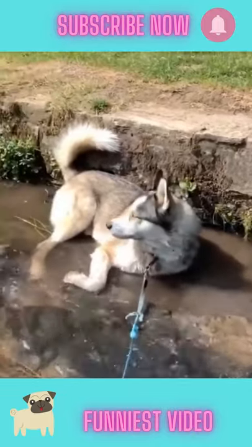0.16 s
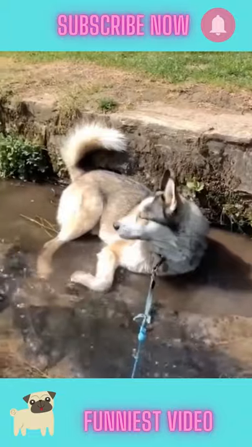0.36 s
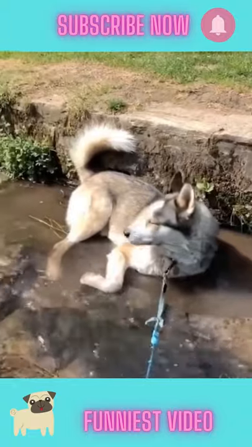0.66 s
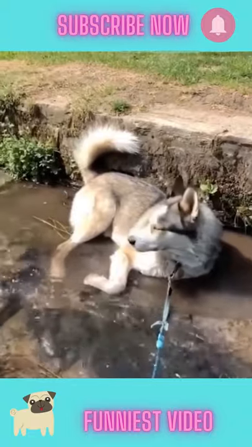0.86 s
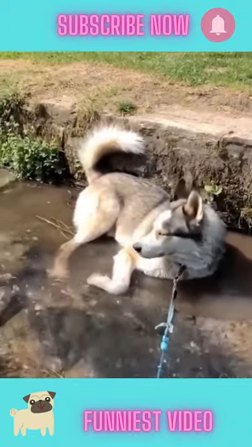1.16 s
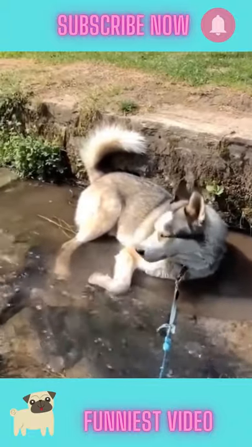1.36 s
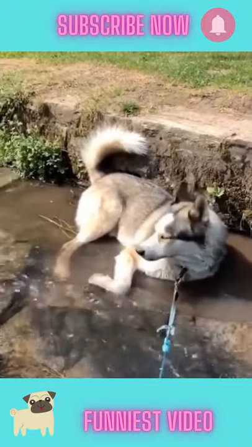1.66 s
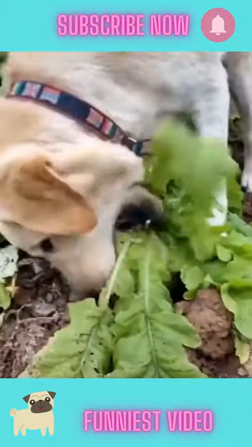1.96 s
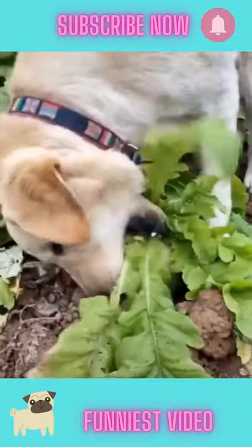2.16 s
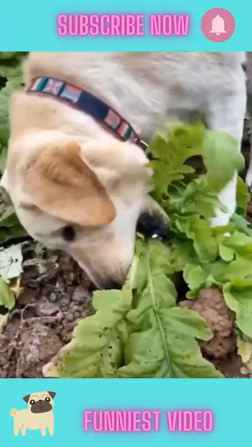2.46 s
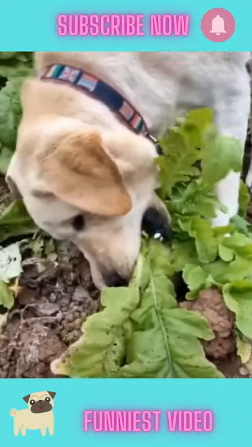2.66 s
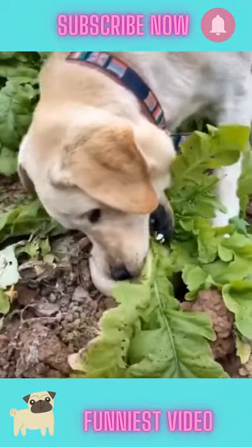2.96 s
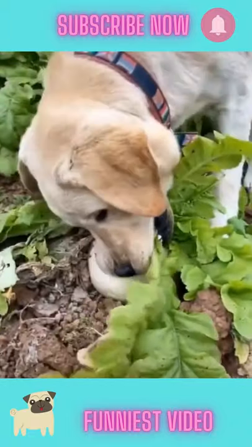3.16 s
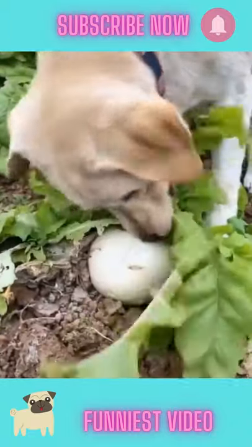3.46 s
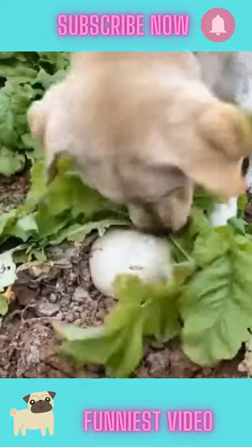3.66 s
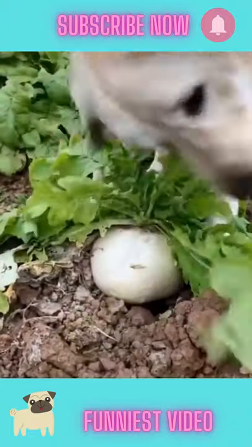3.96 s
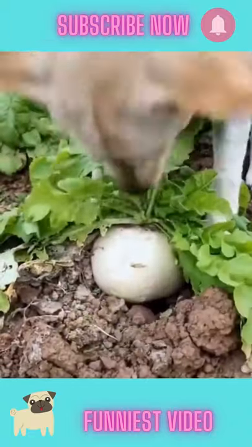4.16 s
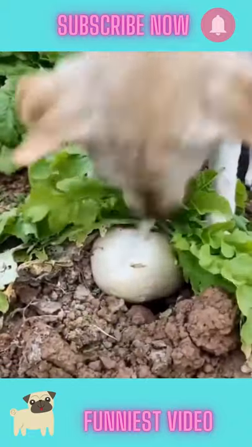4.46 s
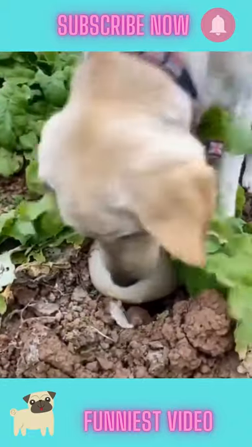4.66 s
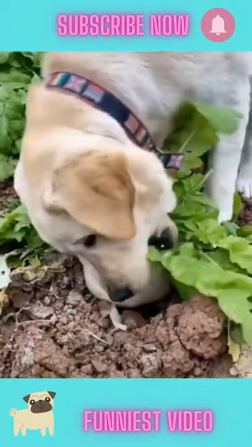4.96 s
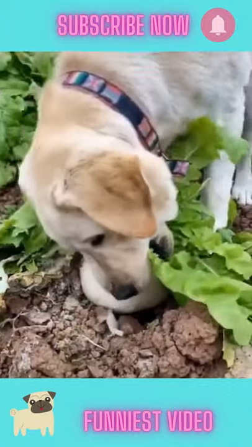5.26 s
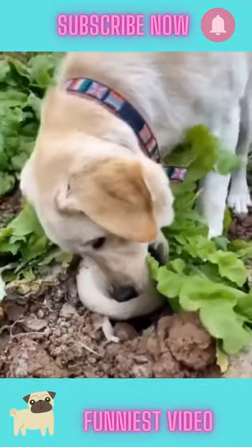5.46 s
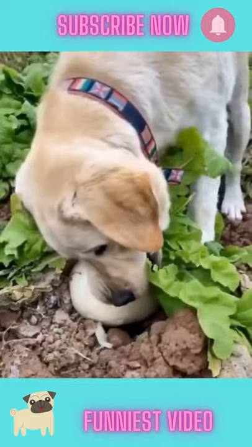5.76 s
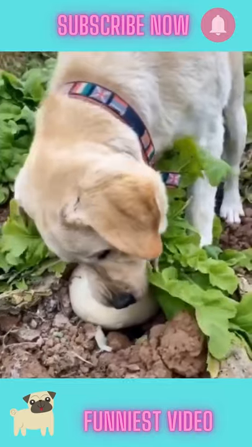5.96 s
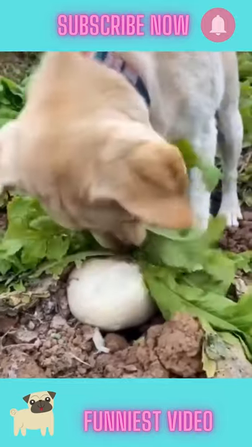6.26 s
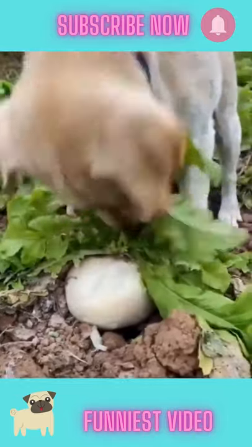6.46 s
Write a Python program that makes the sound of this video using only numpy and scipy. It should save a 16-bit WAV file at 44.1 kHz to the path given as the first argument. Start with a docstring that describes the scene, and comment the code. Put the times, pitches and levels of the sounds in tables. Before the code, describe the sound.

Water laps softly and wide around, slightly left, with plips rising in pitch, and ebbs nearly to silence. At two seconds the sound jumps to a close, dry, centred view of a dog biting a radish: bright irregular cracks, loudest before four seconds, swishing leaves, rolling crumbs and even snuffles; then a sparser middle and renewed crunching to the end. No voices.

```python
"""A dog lies in a shallow stream: water trickles and plips over a soft low rumble, and dies away.
Noise makes the flow; ringing bubbles and tiny clicks make the drops.
After two seconds, close up in a vegetable bed, another dog gnaws a big radish. Short noise bursts make
the crisp snaps, clicks and noise the rustling leaves and crumbling soil; shaped noise makes its snuffling.
Jaws close, teeth slip, and paws and muzzle thud on the ground: all short, fading rings."""
import sys
import numpy as np
from scipy import signal
from scipy.fft import rfft, irfft, next_fast_len
from scipy.io import wavfile
from scipy.ndimage import map_coordinates

SR = 44100
rng = np.random.default_rng(int(sys.argv[2]) if len(sys.argv) > 2 else 0)


def waveform_to_disk(signal):
    """Save audio, clipped to [-1, 1], as 16-bit WAV at the path in sys.argv[1]."""
    frames = np.transpose(np.atleast_2d(signal))
    scaled = np.clip(frames, -1, 1) * 32767
    samples = np.round(scaled).astype(np.int16)
    wavfile.write(sys.argv[1], SR, samples)


N = 291934

GARDEN_START_S = 2.005   # the stream gives way to the vegetable bed
CUTOFF_HZ = 15800

# All levels in the tables are relative: the functions below add their own gains.


def from_db(db):
    """Turn decibels into a plain factor."""
    return 10 ** (np.asarray(db) / 20)


def rms_one(x):
    """Scale a sound to an average strength (rms) of 1."""
    return x / np.sqrt(np.mean(x ** 2) + 1e-20)


def in_time(rows):
    """The columns of a curve, one value per sample."""
    s, *columns = np.transpose(rows)
    return [np.interp(np.arange(N) / SR, s, column) for column in columns]


def seconds(length):
    """A clock that starts at 0 and lasts the given seconds."""
    return np.arange(int(length * SR)) / SR


def add(track, s, sound):
    """Mix a sound in at time s."""
    at = max(round(s * SR), 0)
    track[at:at + len(sound)] += sound[:N - at]


def drift(rate):
    """Smooth random ups and downs around 0, with `rate` new values per second."""
    return np.interp(np.arange(N) / SR * rate, np.arange(4000), rng.standard_normal(4000))


def colour(x, spectrum):
    """Give a noise its balance of low and high pitches; rms 1."""
    hz, db = np.transpose(spectrum)
    size = next_fast_len(N)
    f = np.maximum(np.fft.rfftfreq(size, 1 / SR), 1)
    skirt = np.minimum(f / hz[0], 1) ** 2 * np.minimum(hz[-1] / f, 1) ** 2   # fade beyond both ends
    gain = skirt * from_db(np.interp(np.log(f), np.log(hz), db))
    return rms_one(irfft(rfft(x, size) * gain, size)[:N])


def band(x, low_hz, high_hz):
    """Keep the pitches between two limits."""
    edges = [low_hz, min(high_hz, SR / 2 - 1000)]
    return signal.sosfilt(signal.butter(2, edges, "band", fs=SR, output="sos"), x)


def resonate(x, hz, q):
    """One resonance, gain 1 on top; a higher q rings longer."""
    r = np.exp(-np.pi * hz / q / SR)
    feed = np.array([1, 0, -1]) * (1 - r * r) / 2
    return signal.lfilter(feed, [1, -2 * r * np.cos(2 * np.pi * hz / SR), r * r], x + 1e-18)


def grains(per_s, spread_db, low_hz, high_hz, q, count=18):
    """Clumps of random clicks of uneven size, each ringing at one of many pitches; rms 1."""
    sizes = from_db(spread_db * np.minimum(rng.exponential(1, N), 4)) * rng.choice([-1, 1], N)
    chance = per_s * from_db(3 * drift(110)) / SR   # rises and falls, so clicks come in clumps
    clicks = sizes * (rng.random(N) < chance)
    dealt = rng.integers(0, count, N)
    pitches = np.geomspace(low_hz, min(high_hz, CUTOFF_HZ), count)
    return rms_one(sum(resonate(clicks * (dealt == k), hz, q) for k, hz in enumerate(pitches)))


def wander(x, depth_db, width_hz, per_s):
    """Surfaces that flex and move: peaks about width_hz wide come and go in the sound; rms 1."""
    hz, s, frames = signal.stft(x, SR, nperseg=512)
    patches = rng.standard_normal((400, 500))
    where = np.meshgrid(hz / width_hz, s * per_s, indexing="ij")
    gain_db = depth_db * map_coordinates(patches, where, order=1, mode="mirror")
    return rms_one(signal.istft(frames * from_db(gain_db), SR)[1][:N])


# bites through root and stalk: (time [s], level [dB], crack pitch [Hz],
# knock of the flesh relative to the crack [dB])
BITES = [(2.207, -5, 10400, -2), (2.3145, -10.5, 10500, -1), (2.454, -16, 8500, -24),
         (2.491, -18, 7800, -5), (2.6494, -17, 3830, -11), (2.7034, -17, 4000, -5),
         (2.7196, -11.5, 4200, -13), (2.7587, -13, 3900, -7), (2.842, -7, 7400, -15),
         (2.848, -16.5, 5030, -3), (2.9032, -16.5, 9150, -11), (3.2738, -15.5, 7400, -4),
         (3.2848, -0.5, 9350, -1), (3.486, -2.5, 7660, -3.5), (3.5565, -17.5, 8000, -10),
         (3.5894, -12, 8800, -1), (3.756, 1, 9800, -7), (3.7845, -6.5, 3430, -2.5),
         (3.806, -10.5, 7050, -12), (3.8106, -9, 5500, 3), (4.0089, -8.5, 8200, -8.5),
         (4.3466, -16, 8900, -3), (4.9378, -22.5, 4000, 0), (4.976, -17, 12900, -16),
         (5.477, -13, 12800, -9.5), (5.5372, -15, 12400, -14), (5.593, -15.5, 11750, -4),
         (5.75, -12, 4800, -10.5), (5.8347, -10.5, 8950, -3), (5.841, -16, 9500, -14),
         (5.97, -14.5, 4570, -13), (6.1042, -11.5, 8000, -3), (6.133, -6, 3670, -16),
         (6.1491, -6.5, 3840, -11), (6.3781, -3.5, 8250, -9), (6.4434, -8.5, 7600, -4),
         (6.492, -22.5, 7000, 5.5), (6.4989, -21.5, 6550, 3), (6.5298, -9, 3570, 3),
         (6.5735, -25.5, 2980, 2)]
# the flesh knocks at about the same pitch in every bite
KNOCK_HZ, KNOCK_SCATTER_OCT = 1460, 0.12


def snaps(run_s=0.00034, tear_s=0.00057, push=3, strain_s=0.0093, strain_db=-26,
          crumble_s=0.01, crumble_db=-19, crack_q=5.9, broad_db=-7, knock_q=0.89,
          yield_s=0.001211, gain_db=-11, thin_hz=8000, broad_db_per_oct=4):
    """Cells give under strain, then a crack runs in about a millisecond; the flesh knocks and crumbles."""
    lead_s, span = .012, .003 * SR
    out, t = np.zeros(N), seconds(.06) - lead_s
    after = np.maximum(t, 0)
    strain = from_db(strain_db) * np.exp(-np.abs(t) / strain_s)
    tear = np.exp(-np.maximum(after - run_s, 0) / tear_s)
    crumble = from_db(crumble_db) * np.exp(-after / crumble_s)
    burst = np.where(t < 0, strain, tear + crumble)
    for s, crack_db, crack_hz, knock_db in list(BITES) + fibres():
        cells, flesh = rng.choice([-1, 1], (2, len(t))) * burst
        flesh[round(lead_s * SR)] += push   # the sudden release pushes the whole piece
        knock_hz = KNOCK_HZ * 2 ** (KNOCK_SCATTER_OCT * rng.standard_normal())
        # thick stalks crack lower and splinter less
        splinter_db = broad_db + broad_db_per_oct * np.log2(crack_hz / thin_hz)
        splinter = from_db(splinter_db) * band(cells, 4370, 12900)
        crack = resonate(cells, crack_hz, crack_q) + splinter
        knock = band(resonate(flesh, knock_hz, knock_q) + 0.42 * flesh, 274, 2700)
        for part, db in ((crack, crack_db), (knock, crack_db + knock_db)):
            even = part * np.sqrt(span / np.sum(part ** 2))   # same energy before its level is set
            add(out, s + yield_s - lead_s, from_db(db + gain_db) * even)
    return out


# pushing through the plant: (time [s], leaves level [dB], soil level [dB])
STIRRING = [(2.12, -46, -44.5), (2.19, -41.5, -38), (2.36, -38, -38), (2.54, -36, -43.5), (2.68, -41, -43),
            (3.15, -36, -44), (3.61, -37, -40.5), (4.7, -41.5, -41.5), (4.99, -44, -39.5),
            (5.13, -37.5, -41), (5.26, -40.5, -43.5), (5.9, -47.5, -45), (6.35, -40, -43.5),
            (6.62, -46, -45.5)]
# small fibres give way at random, at a level above that of the leaves
FIBRES_PER_S, FIBRE_DB, FIBRE_SPREAD_DB, FIBRE_KNOCK_DB = 22, 11.5, 1.5, -12
FIBRE_LOW_HZ, FIBRE_HIGH_HZ = 2800, 12000


def fibres():
    """Faint snaps at random moments, louder where the leaves are stirred more; rows like BITES."""
    span = N / SR - GARDEN_START_S
    when, size, pitch = rng.random((int(FIBRES_PER_S * span), 3)).T
    s = GARDEN_START_S + when * span
    leaves_db = in_time(STIRRING)[0][(s * SR).astype(int)]
    db = leaves_db + FIBRE_DB + FIBRE_SPREAD_DB * np.minimum(-np.log(1 - size), 2)
    crack_hz = FIBRE_LOW_HZ * (FIBRE_HIGH_HZ / FIBRE_LOW_HZ) ** pitch
    return [(at, level, hz, FIBRE_KNOCK_DB) for at, level, hz in zip(s, db, crack_hz)]


# the jaws close on root or stalk: (time [s], level [dB])
JAW_BLOWS = [(2.022, -26), (2.7566, 3.5), (2.7742, -18), (2.9766, -12), (3.0002, -15.5), (4.7208, -6),
             (4.743, -18.5)]
# the hollow of the mouth: (pitch [Hz], level [dB], time to fade by 60 dB [s])
MOUTH_RINGS = [(542, -13, 0.025), (990, 3.5, 0.012), (1300, -5.5, 0.009)]


def clops(attack_s=0.0019, gain_db=4):
    """A soft blow of the jaws rings the hollow of the mouth, shaped a little differently each time."""
    out, t = np.zeros(N), seconds(.06)
    for s, db in JAW_BLOWS:
        ring = np.zeros(len(t))
        for hz, level, t60 in MOUTH_RINGS:
            shaped_hz = hz * (1 + 0.017 * rng.standard_normal())
            ring += from_db(level - 60 * t / t60) * np.sin(2 * np.pi * shaped_hz * t)
        add(out, s, from_db(db + gain_db) * (1 - np.exp(-t / attack_s)) * ring)
    return out


# a tooth slips on the root: (time [s], level [dB])
TOOTH_SLIPS = [(2.721, -19.5), (2.7703, -18.5), (2.7804, -23), (2.788, -26), (2.9032, -27)]
# what rings when it catches: (pitch [Hz], level [dB], time to fade by 60 dB [s])
TOOTH_RINGS = [(1937, 0.5, 0.028), (3830, -16, 0.018)]


def tooth_slips(grit=0.35):
    """A tooth slips on the hard root and catches again with a short, gritty ring."""
    out, t = np.zeros(N), seconds(.04)
    for s, db in TOOTH_SLIPS:
        for hz, level, t60 in TOOTH_RINGS:
            rasp = rms_one(resonate(rng.standard_normal(len(t)), hz, 2))
            ring = np.sin(2 * np.pi * hz * t) + grit * rasp
            add(out, s, from_db(db + level - 60 * t / t60) * ring)
    return out


# balance of the leaf sound: (pitch [Hz], level per Hz [dB])
LEAF_SPECTRUM = [(900, -5), (1800, 1.5), (3000, -1.5), (4300, 0.5), (6000, -2.5), (8000, 0.5),
                 (11000, -0.5), (13500, 2.5), (14500, 0), (16000, -12)]
# balance of the soil sound: (pitch [Hz], level per Hz [dB])
SOIL_SPECTRUM = [(30, -11), (60, 5.5), (130, 4.5), (330, -4), (600, 2.5), (1000, -4), (1500, -4),
                 (2300, -11), (4000, -9.5)]


def rummage(leaves_gain_db=-2, soil_gain_db=0, crumbs_db=-6, slide_db=-7, hollow_db=-11, soil_slack=0.8):
    """Stirred or dragged leaves crinkle, soil crumbs roll under them; the rubbing sounds in the open mouth."""
    leaves_db, soil_db = in_time(STIRRING)
    pause_db = slack()
    soil_db = soil_db + soil_slack * pause_db
    creases = grains(per_s=2600, spread_db=2.6, low_hz=1100, high_hz=15600, q=4.5)
    slide, flutter = rng.standard_normal(N), from_db(1.03 * drift(200))
    rubbing = colour(creases + from_db(slide_db) * slide, LEAF_SPECTRUM)
    crinkle = wander(rubbing, depth_db=5.5, width_hz=200, per_s=26) * flutter
    stirred = from_db(leaves_db + leaves_gain_db + pause_db + 2.3 * drift(30))
    leaves = (stirred + tugs()) * crinkle
    soil = wander(colour(rng.standard_normal(N), SOIL_SPECTRUM), depth_db=4, width_hz=130, per_s=30)
    crumbs = grains(per_s=650, spread_db=3.5, low_hz=448, high_hz=1950, q=4.0)
    hollow = rms_one(resonate(crumbs + soil, MOUTH_RINGS[1][0], 9)) * from_db(3 * drift(9))
    ground = from_db(soil_gain_db) * soil + from_db(crumbs_db) * crumbs + from_db(hollow_db) * hollow
    return leaves + swishes(crinkle) + from_db(soil_db) * ground


# every bite pulls the leaves taut and lets them spring back
TUG_RISE_S, TUG_FALL_S = 0.0048, 0.0056
TUG_DB, TUG_FOLLOWS = -32, 0.41   # for a bite of 0 dB in the table; share of the bite's level


def tugs():
    """How strongly the leaves shake round each bite: a quick swell up to the snap and a quick fall."""
    out, t = np.zeros(N), seconds(.2) - .1
    swell = np.exp(-np.abs(t) / np.where(t < 0, TUG_RISE_S, TUG_FALL_S))
    for s, db, *_ in BITES:
        add(out, s + t[0], from_db(TUG_DB + TUG_FOLLOWS * db) * swell)
    return out


# the dog lets go of leaves and soil: (time [s], length [s], change in level [dB])
LETTING_GO = [(2.8, 0.038, -20), (3.02, 0.24, -1), (3.229, 0.042, -13), (3.33, 0.03, -3.5),
              (3.803, 0.047, -5), (5.314, 0.088, -2.5), (5.855, 0.09, -1)]


def slack():
    """The leaves grow quieter for a moment whenever the dog lets go; dB."""
    out = np.zeros(N)
    for s, length, db in LETTING_GO:
        add(out, s, db * np.hanning(len(seconds(length))) ** 0.38)
    return out


# leaves dragged and torn: (time [s], length [s], level [dB], strongest pitch [Hz],
# growth over the stroke [dB])
LEAF_STROKES = [(2.265, 0.036, -30, 12000, -7), (2.592, 0.26, -36.5, 3700, 0), (3.357, 0.16, -29, 3500, 4),
                (3.563, 0.055, -32.5, 8000, -3), (3.668, 0.12, -33.5, 2800, 8),
                (3.872, 0.22, -32.5, 9200, -5.5), (4.228, 0.18, -32, 13300, -6),
                (4.953, 0.11, -34.5, 4360, -3), (5.252, 0.049, -37.5, 3670, 17),
                (5.581, 0.022, -29, 12600, 0), (5.636, 0.018, -31.5, 13000, 6),
                (5.949, 0.051, -35, 4370, -11), (6.074, 0.092, -33.5, 3150, -12),
                (6.217, 0.13, -35, 3300, 2)]


def swishes(crinkle, leaf_q=26.0, leaf_db=0, stalk_db=-10, gain_db=-2.5):
    """A dragged leaf catches and slips: its own resonance colours the crinkle; its stalk scrapes duller."""
    out = np.zeros(N)
    scrape = grains(per_s=1700, spread_db=3.0, low_hz=465, high_hz=2160, q=5.4)
    catch = from_db(2.5 * drift(600))
    for s, length, db, hz, growth_db in LEAF_STROKES:
        stroke = slice(int(s * SR), int((s + length) * SR))
        rub = (crinkle * catch)[stroke]
        blade = rms_one(rub + from_db(leaf_db) * resonate(rub, hz, leaf_q))
        growth = from_db(growth_db * np.linspace(-.5, .5, len(rub)))
        swell = np.hanning(len(rub)) ** 0.12 * growth
        add(out, s, from_db(db + gain_db) * swell * (blade + from_db(stalk_db) * scrape[stroke]))
    return out


# a scrape that falls in pitch just before the jaws close
SCRAPE_S, SCRAPE_LENGTH_S, SCRAPE_DB, SCRAPE_FROM_HZ, SCRAPE_TO_HZ = 4.643, 0.052, -32.5, 3300, 680


def falling_scrape(q=3.2, count=5):
    """Gritty rubbing in a resonance that slides down, as a run of overlapping steps."""
    out, step_s = np.zeros(N), SCRAPE_LENGTH_S / (count + 1)
    swell = np.sqrt(np.hanning(len(seconds(2 * step_s))))
    for k, hz in enumerate(np.geomspace(SCRAPE_FROM_HZ, SCRAPE_TO_HZ, count)):
        grit = rng.standard_normal(SR // 10) ** 3   # cubing makes the noise spiky
        rub = rms_one(resonate(grit, hz, q))[-len(swell):]
        add(out, SCRAPE_S + k * step_s, from_db(SCRAPE_DB) * swell * rub)
    return out


# the dog's nose in the plant, in even bouts: (start time [s], time from puff to puff [s], end time [s],
# level of the first puff [dB], hiss relative to the puff [dB], hiss pitch [Hz])
NOSE_BOUTS = [(2.08, 0.24, 2.2, -32, -15, 1900), (2.46, 0.25, 3.55, -30.5, -7, 1900),
              (4.958, 0.268, 6.15, -30, -8, 2900)]
# the first puff is the longest; each next one is weaker
PUFF_S, FIRST_PUFF_S, PUFF_FADE_DB, NOSTRIL_HZ = 0.077, 0.092, -1.56, 765


def snuffles(nostril_q=2.7, hiss_q=3.1, flutter_db=3, gain_db=0.0):
    """Puffs from the nose swell fast and ebb, fluttering against the leaves and stirring up grit."""
    out = np.zeros(N)
    for start, period, end, db, hiss_db, hiss_hz in NOSE_BOUTS:
        for k, s in enumerate(np.arange(start, end, period)):
            air, grit = rng.standard_normal((2, SR // 4))
            nostril = rms_one(resonate(band(air, 130, 1430), NOSTRIL_HZ, nostril_q))
            hiss = rms_one(resonate(resonate(grit * grit * grit, hiss_hz, hiss_q), hiss_hz, hiss_q))
            puff_s = PUFF_S if k else FIRST_PUFF_S
            progress = np.minimum(np.arange(len(air)) / SR / puff_s, 1)
            swell = np.sin(np.pi * progress ** 0.48)   # early top, slow ebb
            puff = swell * (nostril + from_db(hiss_db) * hiss)
            add(out, s, from_db(db + gain_db + k * PUFF_FADE_DB) * puff)
    return out * from_db(flutter_db * drift(200))


# paws and muzzle on soft ground: (time [s], level [dB], pitch [Hz])
GROUND_BLOWS = [(2.345, -31, 125), (2.472, -31, 248), (2.76, -30.5, 218), (2.77, -29.5, 96),
                (2.978, -36, 203), (3.446, -32.5, 220), (3.985, -30.5, 182), (4.001, -29.5, 97),
                (6.378, -33.5, 160)]


def thuds(t60=0.07, attack_s=0.0044, earth=0.71):
    """Soft earth gives a few low cycles and a dull scuff."""
    out, t = np.zeros(N), seconds(0.12)
    for s, db, hz in GROUND_BLOWS:
        scuff = rms_one(band(rng.standard_normal(len(t)), 46, 1040))
        push = np.sin(2 * np.pi * hz * t) + earth * scuff
        add(out, s, from_db(db + 10.0 - 60 * t / t60) * (1 - np.exp(-t / attack_s)) * push)
    return out


# the flow of the stream: (time [s], rumble level [dB], wash level [dB], spray level [dB])
FLOW = [(0.0, -39, -40.5, -43.5), (0.49, -43, -46, -50.5), (1.114, -44.5, -51, -55.5),
        (1.61, -51, -54.5, -57.5), (1.98, -58, -64.5, -69)]
# balance of the low rumble: (pitch [Hz], level per Hz [dB])
RUMBLE_SPECTRUM = [(25, -10), (42, 1.5), (113, 0), (260, -13), (500, -20)]
# balance of the soft wash: (pitch [Hz], level per Hz [dB])
WASH_SPECTRUM = [(150, -3.5), (300, -3.5), (600, -7), (1300, -11), (2200, -9), (3000, -20), (4500, -13.5)]
# balance of the fine spray: (pitch [Hz], level per Hz [dB])
SPRAY_SPECTRUM = [(2000, -31), (3000, -7.5), (4200, 0), (5300, -15.5), (7300, -1), (9000, -19.5),
                  (12500, -46), (14500, -40)]
# water lapping all around, different at the two sides: (pitch [Hz], level per Hz [dB])
LAPPING_SPECTRUM = [(60, -29), (133, -6), (1040, 6), (1720, -12), (4320, 5), (9000, -55)]
STREAM_LAG_S = 0.00009   # the water lies to the left and reaches the right side later


def stream(spray_db=-5, wash_gain_db=-3, bubbles_db=-3.5, rumble_gain_db=1, lapping_db=-7.0, ticks_db=-17):
    """Small bubbles in a soft wash, fine spray with lone ticks above and a rumble below; left and right."""
    rumble_db, wash_db, spray_level_db = in_time(FLOW)
    rumble = from_db(rumble_db + rumble_gain_db) * colour(rng.standard_normal(N), RUMBLE_SPECTRUM)
    wash_noise = colour(rng.standard_normal(N), WASH_SPECTRUM)
    wash = from_db(wash_db + wash_gain_db) * wander(wash_noise, depth_db=6.0, width_hz=120, per_s=24)
    crowd = gurgle(per_s=400, low_hz=520, high_hz=2900, spread_db=2.7, small_db=-2)
    bubbles = from_db(wash_db + bubbles_db) * crowd
    drops = grains(per_s=3200, spread_db=1.4, low_hz=2630, high_hz=11900, q=18)
    fine = wander(colour(drops, SPRAY_SPECTRUM), depth_db=6, width_hz=331, per_s=19)
    spray = from_db(spray_level_db + spray_db + 2.9 * drift(28.06)) * fine
    lone = grains(per_s=22, spread_db=-0.5, low_hz=5500, high_hz=11200, q=22)
    ticks = from_db(spray_level_db + ticks_db) * lone
    water = rumble + wash + bubbles + plips()
    lapping_noise = colour(rng.standard_normal(N), LAPPING_SPECTRUM)
    lapping = from_db(wash_db + lapping_db) * wander(lapping_noise, depth_db=4.5, width_hz=202, per_s=22)
    # lapping is flipped at the right, so it seems to come from all around
    left, right = water + lapping, np.roll(water, round(STREAM_LAG_S * SR)) - lapping
    return np.array([left, right]) + spray + ticks + spatters()


# large air bubbles: (time [s], level [dB], starting pitch [Hz], rise [starting pitches per s])
LARGE_BUBBLES = [(0.051, -22.5, 2030, 1.8), (0.113, -26, 1336, 2.1), (0.203, -37, 1350, 5),
                 (0.353, -31, 2060, 2.2), (0.489, -36, 2560, 1.8), (0.619, -32, 1235, 2.4),
                 (0.636, -29, 952, 1.4), (0.737, -37, 1385, 4.3), (0.765, -33.5, 1470, 5.7),
                 (0.799, -34, 895, 8.1), (0.823, -35, 3200, 2), (0.834, -37, 1300, 3),
                 (0.979, -39.5, 2110, 2), (1.285, -38, 746, 3), (1.305, -39, 1370, 14),
                 (1.355, -36, 1187, 3), (1.61, -38, 1550, 12), (1.728, -43.5, 1770, 4),
                 (1.926, -49.5, 1170, 3)]


def plips(attack_s=0.0014, cycles=50, gain_db=2, linger_db=-12, linger_cycles=170):
    """A bubble rings for some tens of cycles, lingers faintly and climbs in pitch as it nears the surface."""
    out, t = np.zeros(N), seconds(.14)
    for s, db, hz, rise_per_s in LARGE_BUBBLES:
        phase = 2 * np.pi * hz * (t + rise_per_s * t * t / 2)
        ring = from_db(-60 * t * hz / cycles) + from_db(linger_db - 60 * t * hz / linger_cycles)
        add(out, s, from_db(db + gain_db) * ring * (1 - np.exp(-t / attack_s)) * np.sin(phase))
    return out


def gurgle(per_s, low_hz, high_hz, spread_db, small_db, clump_db=3.5):
    """A crowd of brief bubbles, louder in clumps; the smaller, the higher and fainter; rms 1 while it lasts."""
    cycles, mean_rise_per_s = 58, 2.5   # length of the ring; rise in starting pitches per s
    out, t = np.zeros(N), seconds(.11)
    for when, small, loud, rise in rng.random((int(per_s * GARDEN_START_S), 4)):
        hz = low_hz * (high_hz / low_hz) ** np.sqrt(small)   # small bubbles are the more common
        db = spread_db * min(-np.log(1 - loud), 2) + small_db * small - 60 * t * hz / cycles
        phase = 2 * np.pi * hz * (t + rise * mean_rise_per_s * t * t)
        add(out, when * GARDEN_START_S, from_db(db) * (1 - np.exp(-t * hz / 2)) * np.sin(phase))
    clumped = rms_one(out * from_db(clump_db * drift(22.15)))
    return clumped * np.sqrt(GARDEN_START_S * SR / N)   # allow for the silence after the stream


# droplets spatter on the surface: (time [s], level [dB], pitch [Hz])
DROPLETS = [(0.109, -28, 6900), (0.1492, -28.5, 6300), (0.3696, -32.5, 10200), (1.1248, -37.5, 7900)]


def spatters(gain_db=-6, q=2.5):
    """A droplet breaks the surface with a short bright tick."""
    decay_s = 0.005
    out, t = np.zeros(N), seconds(0.027)
    for s, db, hz in DROPLETS:
        fizz = rms_one(resonate(resonate(rng.standard_normal(len(t)), hz, q), hz, q))
        add(out, s, from_db(db + gain_db) * np.exp(-t / decay_s) * fizz)
    return out


def scene():
    """First the stream, a little to the left; then the vegetable bed, straight ahead."""
    in_garden = np.clip((np.arange(N) / SR - GARDEN_START_S) / .004, 0, 1)   # crossfade of 4 ms
    mouth = snaps() + clops() + tooth_slips()
    garden = mouth + rummage() + falling_scrape() + snuffles() + thuds()
    return (1 - in_garden) * stream() + in_garden * garden


def record(dry):
    """The highest peaks are rounded and the top of the treble is cut."""
    rounded = .9 * np.tanh(dry / .9)
    return signal.sosfilt(signal.ellip(10, .2, 80, CUTOFF_HZ, fs=SR, output="sos"), rounded)


dry = scene()
out = record(dry)
waveform_to_disk(out)
```